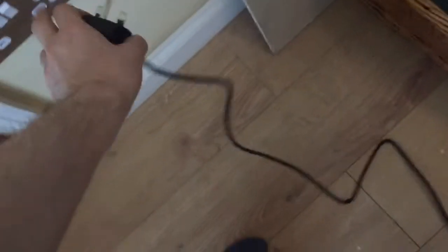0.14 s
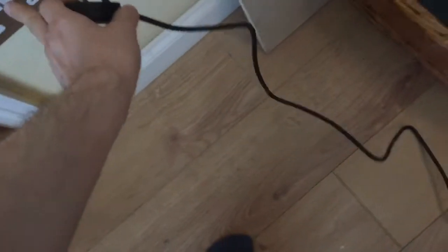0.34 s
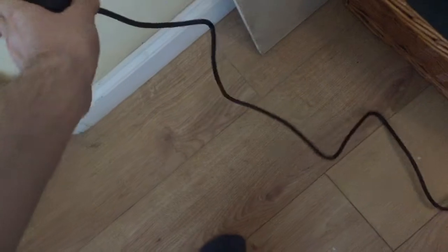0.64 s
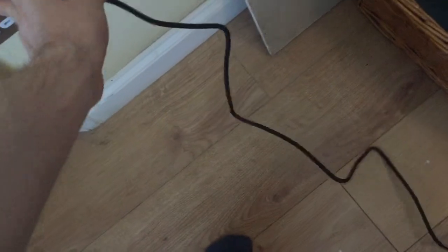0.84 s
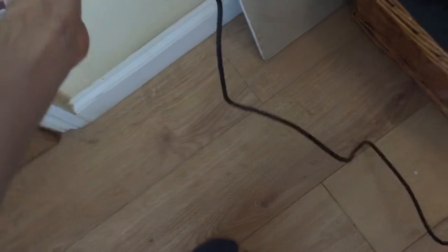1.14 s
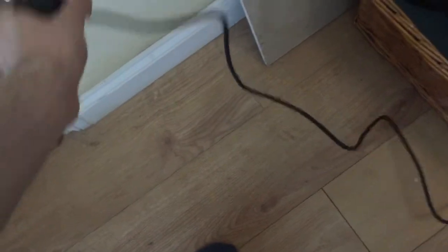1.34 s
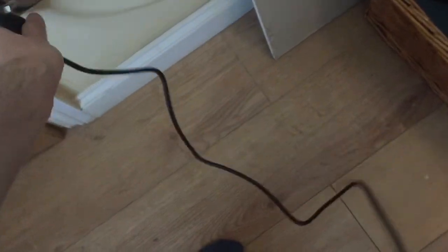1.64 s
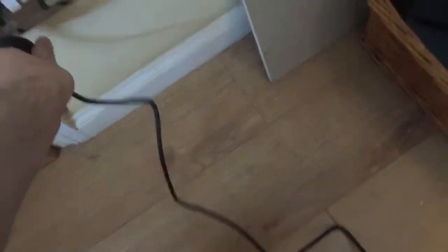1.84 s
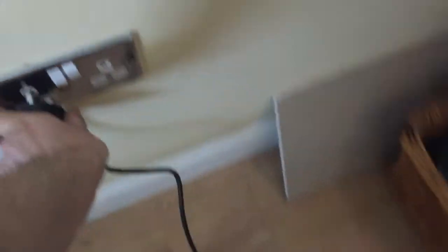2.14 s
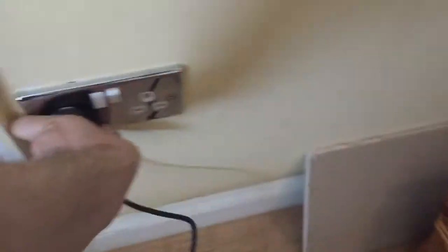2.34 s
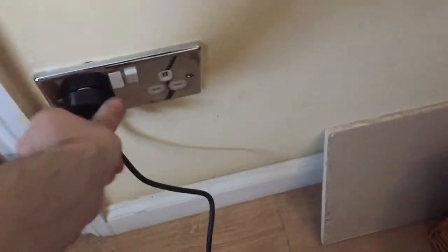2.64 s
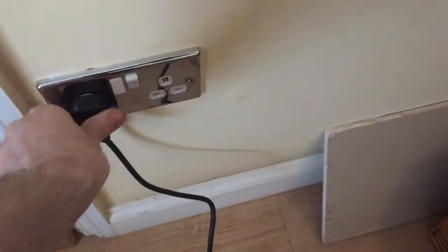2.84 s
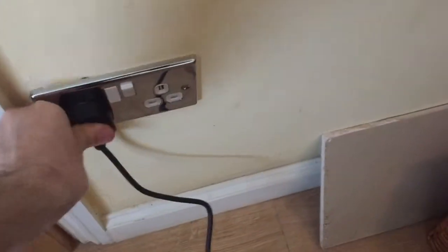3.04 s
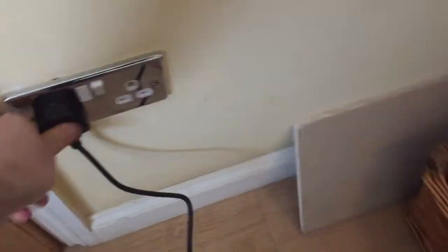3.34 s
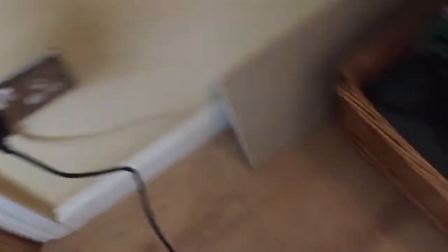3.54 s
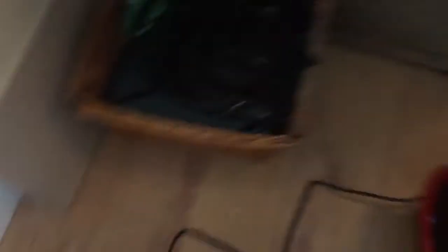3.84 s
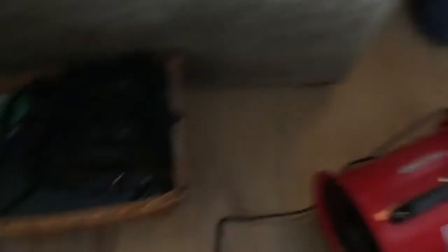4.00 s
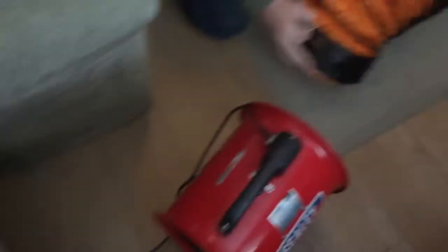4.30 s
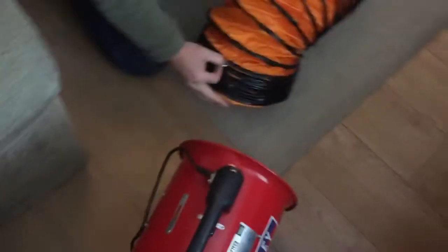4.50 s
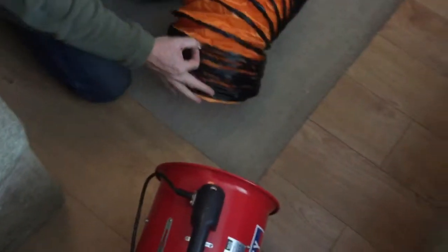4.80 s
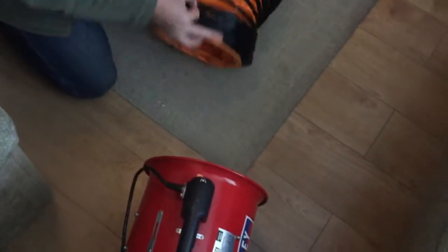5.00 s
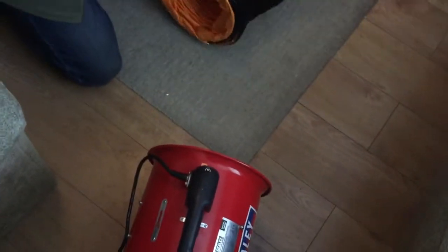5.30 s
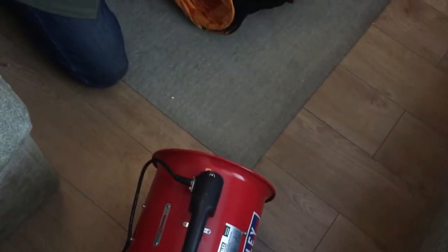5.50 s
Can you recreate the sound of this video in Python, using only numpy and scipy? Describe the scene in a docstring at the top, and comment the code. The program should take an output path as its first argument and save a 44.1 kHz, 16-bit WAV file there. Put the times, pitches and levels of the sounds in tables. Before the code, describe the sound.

A quiet, small furnished room with soft, steady room tone, captured by a handheld camera with low handling rumble. At 0 s the pins of a mains plug clink and shimmer lightly, with finger rubs and a faint scrape near 0.3 s. Dull bumps and a muted knock come around 0.9-1.0 s, then a socket switch snaps very sharply at 1.2 s. From 1.57 s the plug knocks on the steel faceplate, with a bright, hard clack at 1.75 s, a rattling cluster around 2.0 s and more grazing and knocks at 2.3-2.5 s. It grinds in and seats with a hollow wall thump at 2.76 s; tiny clicks and metallic ticks follow to 3.1 s. From 3.4 s a plastic duct further off crinkles sparsely, swelling into dense snaps and soft booms at 4.2-4.6 s. Scattered pops follow, a springy metal twang at 5.1 s, and a last faint tick at 5.6 s.

```python
"""Plug and socket up close, plastic duct further off

A small furnished room, heard through a hand-held camera's microphone. Close by, a mains plug clinks (ringing pins),
a socket switch snaps (three quick pulses and a rattle), and the plug knocks and grazes on the steel faceplate (noise
bursts through resonances) and is shoved home (grinding, then a thump). Further off, a plastic air duct booms, crinkles
and creases as it is squeezed. Fingers rub, soft things bump, metal twangs; a quiet room tone lies under it all.
"""
import sys
import numpy as np
from scipy import signal
from scipy.fft import rfft, irfft, next_fast_len
from scipy.io import wavfile
from scipy.ndimage import uniform_filter1d, map_coordinates

SR = 44100
rng = np.random.default_rng(int(sys.argv[2]) if len(sys.argv) > 2 else 0)


def wrap_up_sound(samples):
    """Save the sound to the file named by the first command line argument, as 16-bit audio."""
    columns = np.atleast_2d(samples).T
    # keep every value between -1 and 1, then stretch to whole-number steps
    tamed = np.clip(columns, -1, 1)
    steps = np.round(tamed * 32767).astype(np.int16)
    wavfile.write(sys.argv[1], SR, steps)


N = 249372
TIME = np.arange(N) / SR
AGE = TIME[:SR // 2]  # the half second that one short event may last
LEAD_S = 0.01  # surfaces graze this long before they crack together


def amp(db):
    """Decibels to gain."""
    return 10 ** (np.asarray(db) / 20)


def unit(x):
    """x at rms 1."""
    return x / np.sqrt(np.mean(x ** 2) + 1e-20)


def unit_hit(x):
    """x at rms 1 over its loudest 6 ms."""
    power = uniform_filter1d(x ** 2, size=265, mode="constant")
    return x / np.sqrt(power.max() + 1e-20)


def fade(t, t60):
    """A decay of 60 dB in t60 seconds (at least 1 ms)."""
    return 1000. ** (-t / np.maximum(t60, 1e-3))


def swell(s, hold, rise, fall):
    """An envelope that swells up to time s, holds, and dies away; rise and fall are seconds per 60 dB."""
    return fade(np.maximum(s - TIME, 0), rise) * fade(np.maximum(TIME - s - hold, 0), fall)


def gestures(rows, rise, fall):
    """The envelopes of the two layers that each row (start, hold, level, level) drives."""
    return sum(amp(levels_db)[:, None] * swell(s, hold, rise, fall) for s, hold, *levels_db in rows)


def wobble(size, per_s):
    """A smooth random curve, per_s knots a second."""
    at = np.arange(size) * per_s / SR
    return map_coordinates(rng.standard_normal(int(at[-1]) + 4), [at])


def add(track, s, sound):
    """Mix a sound into the track at time s."""
    part = track[max(round(s * SR), 0):][:len(sound)]
    part += sound[:len(part)]


def along(points, hz):
    """Read a (Hz, value) curve along a log frequency axis."""
    f, v = np.transpose(points)
    return np.interp(np.log(hz + 1), np.log(f + 1), v)


def filtered(x, response):
    """x times a response of frequency."""
    m = next_fast_len(len(x) + SR // 4)
    return irfft(rfft(x, m) * response(np.fft.rfftfreq(m, 1 / SR)), m)[:len(x)]


def coloured(x, spectrum):
    """x shaped by a (Hz, dB) spectrum, at rms 1."""
    return unit(filtered(x, lambda hz: amp(along(spectrum, hz))))


def noise(spectrum, size=N):
    """Smooth coloured noise at rms 1."""
    return coloured(rng.standard_normal(size), spectrum)


def grains(spectrum, per_s, spread_db, smooth):
    """Friction: tiny slips of uneven size on a bed of noise."""
    size = amp(spread_db * np.clip(rng.standard_normal(N), -2, 2))
    slips = (rng.random(N) < per_s / SR) * rng.choice([-1, 1], N) * size
    return coloured(unit(slips) + smooth * rng.standard_normal(N), spectrum)


def ring(modes):
    """Struck modes (Hz, dB, t60 s), at new strengths for each blow."""
    out = np.zeros(len(AGE))
    for hz, db, t60 in modes:
        strength = amp(db + rng.normal(0, 0.4))
        out += strength * fade(AGE, t60) * np.sin(2 * np.pi * (hz * AGE + rng.random()))
    return unit_hit(out)


def resonate(x, modes):
    """x through parallel (Hz, width Hz, dB) resonances of alternating sign."""
    def response(f):
        total = 0
        for k, (hz, width, db) in enumerate(modes):
            peak = 1j * f * width / (hz * hz - f * f + 1j * f * width)
            total = total + (-1) ** k * amp(db) * peak
        return total
    return filtered(x, response)


def strike(t60, lead_db, crack):
    """A contact: surfaces graze for LEAD_S, crack together and settle in uneven rebounds."""
    t = AGE - LEAD_S
    rebounds = amp(3 * wobble(len(t), per_s=450) - 1)
    before = amp(lead_db) * fade(abs(t), 0.019)
    after = rebounds * fade(abs(t), t60) + crack * fade(abs(t), 0.001)
    return np.where(t < 0, before, after) * rng.standard_normal(len(t))


def voiced(burst, edges, levels_db):
    """A burst split into bands, each at its own strength."""
    out = 0
    for band, db in zip(zip(edges, edges[1:]), levels_db):
        sos = signal.butter(N=3, Wn=band, btype="band", fs=SR, output="sos")
        out = out + amp(db) * unit_hit(signal.sosfilt(sos, burst))
    return out


def tilted(bands_db, tilt_db):
    """Band levels tipped towards the treble by tilt_db per band."""
    steps = np.arange(len(bands_db))
    return np.asarray(bands_db) + tilt_db * (steps - steps.mean())


# small furnished room: pitch_hz [Hz], t60_s [s]
ROOM_DECAY = [(200, 0.27), (700, 0.27), (2500, 0.24), (6000, 0.2), (12000, 0.17)]


def room(x):
    """The room's answer: a diffuse tail in which the treble dies first."""
    hz, t, z = signal.stft(rng.standard_normal(len(AGE)), SR, nperseg=256)
    decaying = z * fade(t, along(ROOM_DECAY, hz)[:, None])
    tail = signal.istft(decaying, SR, nperseg=256)[1]
    tail = tail * (1 - fade(np.arange(len(tail)) / SR, 0.013))  # reflections take a moment to build up
    return signal.fftconvolve(x, tail / np.linalg.norm(tail))[:len(x)]


def heard(x, room_db):
    """Direct sound plus the room at room_db; more room puts a source further from the microphone."""
    return x + amp(room_db) * room(x)


# room tone, spectral density: pitch_hz [Hz], level_db [dB, relative]
ROOM_TONE = [(15, -38.5), (25, -2), (64, -3.5), (273, 0), (485, -11.5), (697, -8.5), (2430, -12),
             (4900, -14.5), (6700, -15.5), (8910, -17), (12500, -26.5), (16200, -48.5), (22000, -120)]


def room_tone():
    """The quiet of the room: steady coloured noise."""
    return amp(-69.0) * noise(ROOM_TONE)


# fingers sliding over plug and cable, levels before the mix in handling():
# start_s [s], hold_s [s], body_db [dB], hiss_db [dB]
FINGER_STROKES = [(0.0, 0.023, -51, -49.5), (0.22, 0.039, -70, -57), (0.66, 0.59, -82, -74.5),
                  (1.05, 0.15, -64.5, -62), (1.6, 0.11, -54.5, -62.5), (1.94, .1, -48, -58.5),
                  (2.18, 0.29, -49, -55.5), (2.74, 0.17, -72, -56), (3.26, 0.17, -67.5, -71)]
STROKE_RISE_S, STROKE_FALL_S = 0.25, 0.64  # time to swell or die by 60 dB
# low and high part of the rubbing, spectral density: pitch_hz [Hz], level_db [dB, relative]
RUB_BODY_SPECTRUM = [(41, -44), (70, -7), (124, -6.5), (422, -4.5), (492, -10), (670, -6), (899, -11),
                     (2000, -11.5), (2600, -51.5), (4400, -120)]
RUB_HISS_SPECTRUM = [(710, -8.5), (1200, -8), (1580, -7.5), (2660, -2), (3710, -0.5), (4880, -8),
                     (8700, -8.5), (12500, -46), (16200, -62), (22000, -120)]
# resonances of plug and faceplate: pitch_hz [Hz], width_hz [Hz], level_db [dB, relative]
PLATE_MODES = [(260, 270, -11), (703, 120, 3), (800, 130, -4), (1038, 180, -2.5), (1980, 200, -5),
               (2480, 260, 3.5), (3220, 230, -1.5), (3450, 210, 1.5), (4284, 120, -1), (4280, 280, -8.5),
               (5950, 420, 1), (6750, 250, 2), (6900, 90, 8), (8200, 980, -0.5)]
# soft bumps: start_s [s], level_db [dB, before BUMP_TRIM_DB], pitch_hz [Hz]
SOFT_BUMPS = [(0.211, -54, 372), (0.312, -49.5, 154), (0.831, -44.5, 99), (0.888, -37.5, 60.7),
              (0.923, -49.5, 375), (0.98, -36.5, 344), (1.06, -49.5, 124), (1.574, -30.5, 339),
              (2.128, -50, 370), (2.332, -36.5, 104), (2.418, -42, 117), (2.764, -35, 150),
              (3.545, -47, 208), (3.946, -43, 60), (4.03, -49, 60), (4.101, -35, 311), (4.502, -30.5, 322),
              (5.055, -35, 224), (5.077, -40.5, 107), (5.239, -39, 183)]
BUMP_TRIM_DB = -4
# jolts of the hand that holds the camera: peak_s [s], level_db [dB, before RUMBLE_TRIM_DB]
HAND_JOLTS = [(0.03, -69), (0.39, -53.5), (0.884, -50), (1.05, -59), (1.6, -54), (1.86, -52.5), (2.02, -49),
              (2.33, -42), (2.771, -37), (3.13, -57), (3.64, -60), (4.0, -66), (4.32, -64), (4.511, -40.5),
              (5.081, -57), (5.27, -65)]
JOLT_RISE_S, JOLT_FALL_S = 0.22, 0.24  # time to swell or die by 60 dB
TREMOR_DB, RUMBLE_TRIM_DB = -74, -5.0  # rumble of a still hand before the trim; trim of all rumble
# handling rumble, spectral density: pitch_hz [Hz], level_db [dB, relative]
RUMBLE_SPECTRUM = [(20, -24), (45, 0), (100, -1.5), (160, -11), (300, -56)]


def handling():
    """Fingers catch and slip on plug and cable; soft things bump; the camera rumbles in the hand."""
    body, hiss = gestures(FINGER_STROKES, STROKE_RISE_S, STROKE_FALL_S)
    catching = amp(2.5 * wobble(N, per_s=60))
    slips = grains(RUB_BODY_SPECTRUM, per_s=360, spread_db=3.5, smooth=0.9)
    friction = amp(-2.5) * body * slips + amp(-1.5) * hiss * noise(RUB_HISS_SPECTRUM)
    friction = catching * friction
    out = 0.6 * friction + 0.19 * resonate(friction, PLATE_MODES)  # the plug colours the rubbing
    for s, db, hz in SOFT_BUMPS:
        u = AGE / (0.003 + 0.25 / hz)  # deeper bumps swell and die more slowly
        push = u * np.exp(1 - u) * np.sin(2 * np.pi * hz * AGE)
        add(out, s, heard(amp(db + BUMP_TRIM_DB) * push, room_db=-8))
    shake = amp(TREMOR_DB) + sum(amp(db) * swell(s, 0, JOLT_RISE_S, JOLT_FALL_S) for s, db in HAND_JOLTS)
    return out + amp(RUMBLE_TRIM_DB) * shake * noise(RUMBLE_SPECTRUM)


# ringing metal of the plug's pins: pitch_hz [Hz], level_db [dB, relative], t60_s [s]
PIN_MODES = [(2310, -9, 0.44), (2430, 0, 0.53), (2980, -8, 0.37), (3400, -1, 0.67), (3350, 7, 0.11),
             (3180, -4, 0.32), (4200, -20, 0.29), (4320, -12, 0.99), (5140, -23, 0.26), (5820, -31, 5.0),
             (6460, -33, 0.45), (6850, -10, 0.55)]
# contact noise and scrape of the pins, spectral density: pitch_hz [Hz], level_db [dB, relative]
CLINK_SPECTRUM = [(120, -16), (200, -9), (492, -28), (785, -6), (982, -46), (1230, -15), (1860, -15),
                  (2540, -11), (2770, -5.5), (6150, -13), (12500, -37), (16200, -72), (22000, -120)]
SCRAPE_SPECTRUM = [(880, -46), (1500, -22), (1880, -17), (2280, 7), (2690, 7.5), (3010, 3), (3940, -1),
                   (4260, 1), (5530, -6), (5680, 3), (6820, -0.5), (9490, -13), (12000, -32), (15600, -60),
                   (22000, -120)]


def clink():
    """The plug's metal pins clink and shimmer, then scrape lightly as it is lifted."""
    out = np.zeros(N)
    contact = unit_hit(noise(CLINK_SPECTRUM, size=len(AGE)) * fade(AGE, 0.073))
    shimmer = unit(resonate(noise(SCRAPE_SPECTRUM, size=len(AGE)), [(2540, 1500, 0)])) * fade(AGE, 0.42)
    add(out, 0.016, amp(-34.0) * contact + amp(-42.0) * shimmer + amp(-50.0) * ring(PIN_MODES))
    lift = np.exp(-((TIME - 0.28) / 0.039) ** 2)
    out += amp(-57.0) * noise(SCRAPE_SPECTRUM) * lift
    return heard(out, room_db=-5)


# limits of thud, knock, clack and tick: edge_hz [Hz]
KNOCK_EDGES_HZ = [150, 500, 1500, 4500, 9400]
# those four bands in an average touch: level_db [dB, relative]
KNOCK_BAND_LEVELS_DB = [-11, -1.5, 0, -6]


def touch(t60, hardness_db):
    """A short chatter excites the resonances of plug and plate; hard touches are brighter."""
    chatter = strike(t60, lead_db=-26, crack=0.4)
    # grip and point of contact detune the modes and stress different ones
    modes = [(hz * rng.normal(1, 0.015), width, db + rng.normal(0, 1.8)) for hz, width, db in PLATE_MODES]
    bands_db = tilted(KNOCK_BAND_LEVELS_DB, hardness_db)
    return voiced(0.35 * chatter + resonate(chatter, modes), KNOCK_EDGES_HZ, bands_db)


# the fingers work the plug towards the holes: start_s [s], end_s [s]
FUMBLE_SPAN_S = (1.6, 2.66)
GRAZE_DB, GRAZE_SPREAD_DB, GRAZE_T60_S = -6, 0.5, 0.012  # level re body_db of the strokes, scatter, decay


def grazes(count):
    """While the fingers work the plug towards the holes, its pins graze the plate at random."""
    out = np.zeros(N)
    times = rng.uniform(*FUMBLE_SPAN_S, count)
    for s, (size, hardness) in zip(times, rng.uniform(-1, 1, (count, 2))):
        graze = touch(GRAZE_T60_S, hardness_db=3 * hardness)
        add(out, s, amp(GRAZE_DB + GRAZE_SPREAD_DB * size) * graze)
    rubbing, _ = gestures(FINGER_STROKES, STROKE_RISE_S, STROKE_FALL_S)
    return rubbing * out


# plug and socket knocking together: start_s [s, before KNOCK_DELAY_S], level_db [dB, before KNOCK_TRIM_DB],
# hardness_db [dB of tilt per band], t60_s [s]
PLUG_KNOCKS = [(0.378, -56.5, -13, 0.018), (0.977, -35, -2, 0.034), (1.001, -42.5, -5.5, 0.11),
               (1.569, -27, -0.5, 0.07), (1.749, -17.5, 5, 0.038), (1.757, -25.5, -1.5, 0.026),
               (1.78, -43, -11, 0.075), (1.82, -31, 0, 0.12), (1.866, -43.5, 5, .012),
               (1.964, -52, -12.5, 0.03), (1.996, -29, -2.5, 0.034), (2.007, -35.5, 1, 0.075),
               (2.194, -45, -5.5, .015), (2.258, -43, 0.5, 0.062), (2.3143, -26, -2, 0.079),
               (2.329, -29.5, 4.5, 0.018), (2.342, -38.5, 2, 0.0066), (2.411, -29, 4.5, 0.033),
               (2.48, -36.5, -3, 0.027), (2.753, -37, -4, 0.033), (2.828, -53, 11, 0.036),
               (2.838, -51.5, 13.5, 0.0096), (3.092, -47.5, 1.5, 0.016), (3.103, -46, -7, 0.044),
               (3.131, -43, 5.5, 0.057)]
KNOCK_DELAY_S, KNOCK_TRIM_DB, KNOCK_ROOM_DB = 0.0024, -6.5, -12


def plug():
    """The plug knocks on the faceplate, with light grazes in between."""
    out = heard(grazes(count=20), KNOCK_ROOM_DB)
    for s, db, hardness_db, t60 in PLUG_KNOCKS:
        knock = amp(db + KNOCK_TRIM_DB) * touch(t60, hardness_db)
        add(out, s + KNOCK_DELAY_S - LEAD_S, heard(knock, KNOCK_ROOM_DB))
    return out


# short slides of plug, fingers and cable: middle_s [s], level_db [dB], pitch_hz [Hz], half_length_s [s]
SHORT_SLIDES = [(0.678, -79, 4030, 0.085), (1.084, -57, 1450, 0.027), (2.145, -61, 693, 0.021),
                (2.263, -57, 960, 0.047), (2.411, -37.5, 3300, 0.005), (2.918, -56.5, 1020, 0.011),
                (3.068, -57.5, 1080, 0.015), (3.104, -51.5, 970, 0.013), (3.274, -67, 1050, 0.056)]


def scuffs():
    """Brief slides swell and fade, each rasping around one pitch."""
    out = np.zeros(N)
    middle = AGE.mean()
    for s, db, hz, half in SHORT_SLIDES:
        rasp = unit(resonate(rng.standard_normal(len(AGE)), [(hz, 0.23 * hz, 0)]))
        add(out, s - middle, amp(db) * rasp * np.exp(-((AGE - middle) / half) ** 2))
    return heard(out, room_db=-4.0)


# sprung metal in the socket and in the duct's wire hoop:
# start_s [s], level_db [dB], pitch_hz [Hz], width_hz [Hz], t60_s [s]
METAL_TWANGS = [(0.719, -68, 4320, 4000, 0.019), (2.374, -49.5, 4300, 1200, 0.016),
                (2.828, -45.5, 5500, 600, 0.032), (2.891, -56, 5160, 1220, 0.035),
                (3.134, -45.5, 5100, 500, 0.11), (3.141, -50, 11400, 3520, 0.03),
                (3.632, -53.5, 5100, 300, 0.055), (3.741, -48.5, 5150, 350, 0.24),
                (4.703, -51, 4450, 500, 0.054), (4.753, -46.5, 4520, 600, 0.05),
                (5.088, -34.5, 1077, 298, 0.16), (5.092, -42.5, 8600, 1360, 0.19),
                (5.119, -41.5, 1060, 180, 0.19)]


def twangs():
    """Springy metal buzzes briefly around one pitch: a strike through two resonances in a row."""
    out = np.zeros(N)
    for s, db, hz, width, t60 in METAL_TWANGS:
        buzz = resonate(strike(t60, lead_db=-32, crack=0.55), [(hz, width, 0)])
        add(out, s - LEAD_S, amp(db) * unit_hit(resonate(buzz, [(hz, 2 * width, 0)])))
    return out


# the rocker's contacts as it flips over: start_s [s], peak_db [dB], pitch_hz [Hz], swell_s [s, half the time to peak]
ROCKER_CONTACTS = [(1.1965, -9, 2520, 0.00032), (1.1974, -18, 5660, 0.00014), (1.1983, -15, 6480, 0.00049)]
# switch housing, spectral density: pitch_hz [Hz], level_db [dB, relative]
HOUSING_SPECTRUM = [(300, -38.5), (700, -17.5), (1200, -6), (1700, -8), (2150, 0.5), (2600, -3.5),
                    (3400, 0.5), (4800, -8.5), (5400, -5), (6000, -10.5), (6550, -8), (7400, -3.5),
                    (9300, -11.5), (12500, -22)]


def switch():
    """The sprung rocker flips over in three quick contacts and shakes its housing."""
    out = np.zeros(N)
    for s, db, hz, swell_s in ROCKER_CONTACTS:
        u = AGE / swell_s
        pulse = u ** 2 * np.exp(-u)  # a smooth push, so no bass
        add(out, s, amp(db) * pulse / pulse.max() * np.sin(2 * np.pi * hz * AGE))
    rattle = noise(HOUSING_SPECTRUM, size=len(AGE)) * fade(AGE, 0.027) * (1 - fade(AGE, 0.0056))
    add(out, 1.1962, amp(-20.5) * unit_hit(rattle))
    return heard(out, room_db=-12)


# dull groan of pins in the spring contacts, spectral density: pitch_hz [Hz], level_db [dB, relative]
GROAN_SPECTRUM = [(40, -32), (90, -8.5), (170, -6.5), (300, -5.5), (400, -23.5), (600, -11), (1000, -17),
                  (1600, -15.5), (3000, -21.5), (8000, -40.5)]
# the pins' fine rasp, spectral density: pitch_hz [Hz], level_db [dB, relative]
GRIT_SPECTRUM = [(400, -8), (1000, 6.5), (2000, -7.5), (4500, -5), (9000, -8), (10500, -20), (12500, -39)]
# hollow wall behind the socket: pitch_hz [Hz], level_db [dB, relative], t60_s [s]
WALL_MODES = [(177, 10.5, 0.11), (304, -10, 0.084), (415, -5, 0.24), (469, -4, 0.25), (557, 7, 0.076),
              (603, 7, 0.087), (730, -2, 0.15), (850, -30, 0.28), (883, -1, 0.15)]


def shove():
    """The pins grind into their springs ever harder until the plug seats and thumps the wall."""
    seat_s = 2.758
    away = abs(TIME - seat_s)
    force = np.where(TIME < seat_s, 0.53 * fade(away, 0.34), fade(away, 0.29))
    rasp = grains(GRIT_SPECTRUM, per_s=900, spread_db=5, smooth=0.4)
    out = force * (amp(-34) * noise(GROAN_SPECTRUM) + amp(-37.0) * rasp)
    add(out, seat_s, amp(-28.0) * ring(WALL_MODES) * (1 - fade(AGE, 0.0048)))
    return heard(out, room_db=-13.0)


# limits of pop, snap and tick: edge_hz [Hz]
CREASE_EDGES_HZ = [560, 1500, 5000, 9500]
# those three bands in an average crease: level_db [dB, relative]
CREASE_BAND_LEVELS_DB = [-6, -0.5, -4.5]


def crease(hz, t60, sharpness_db):
    """One crease buckles and rings at its own pitch."""
    buckle = strike(t60, lead_db=-12.5, crack=1.0)
    panel = resonate(buckle, [(hz, 100 + 0.27 * hz, 6)])
    return voiced(buckle + panel, CREASE_EDGES_HZ, tilted(CREASE_BAND_LEVELS_DB, sharpness_db))


# hands squeezing the duct: start_s [s], hold_s [s], boom_db [dB], crinkle_db [dB]
DUCT_SQUEEZES = [(3.366, 0.012, -71.5, -63.5), (3.611, .01, -55, -61.5), (3.741, 0.0081, -77, -59.5),
                 (3.828, 0.059, -70, -54), (3.998, 0.0062, -59, -56), (4.127, 0.11, -55.5, -52.5),
                 (4.286, 0.093, -46.5, -43.5), (4.479, 0.037, -45.5, -50.5), (4.569, 0.012, -50.5, -72),
                 (4.867, .02, -67.5, -64.5), (5.057, 0.042, -56.5, -50), (5.215, 0.037, -52.5, -54.5)]
SQUEEZE_RISE_S, SQUEEZE_FALL_S = 0.15, 0.27  # time to swell or die by 60 dB
CREASE_HZ, CREASE_TILT_DB = 2220, 4  # middle pitch of small creases; tilt per band for each octave above it
SMALL_DB, SMALL_SPREAD_DB, SMALL_T60_S = 3, 2.5, 0.017  # level over the crinkle, scatter, decay


def small_creases(count):
    """Small creases of random pitch and size, scattered over the time in which the duct is squeezed."""
    out = np.zeros(N)
    times = rng.uniform(DUCT_SQUEEZES[0][0], DUCT_SQUEEZES[-1][0], count)
    for s, (size, octaves) in zip(times, rng.uniform(-1, 1, (count, 2))):
        snap = crease(CREASE_HZ * 2 ** octaves, SMALL_T60_S, CREASE_TILT_DB * octaves)  # higher ones are sharper
        add(out, s, amp(SMALL_DB + SMALL_SPREAD_DB * size) * snap)
    return out


# large creases snapping over: start_s [s, before CREASE_DELAY_S], level_db [dB, before CREASE_TRIM_DB],
# sharpness_db [dB of tilt per band], pitch_hz [Hz], t60_s [s]
LARGE_CREASES = [(3.372, -39, -1, 2520, 0.056), (3.384, -48.5, 13, 8800, 0.02),
                 (3.625, -44.5, -2.5, 1200, 0.095), (3.739, -40, 0.5, 1120, 0.11),
                 (3.828, -33.5, 5.5, 8640, 0.041), (3.837, -40, 3, 8200, 0.067),
                 (3.874, -42, 7.5, 6300, .024), (3.893, -39.5, 0.5, 2080, 0.064),
                 (3.986, -43.5, 2, 3070, 0.03), (4.044, -44, 6.5, 6240, 0.11),
                 (4.088, -35.5, 1.5, 2800, 0.036), (4.103, -33.5, -0.5, 1680, 0.039),
                 (4.159, -46.5, 8, 5600, 0.038), (4.196, -32, -2.5, 2100, 0.04),
                 (4.236, -36.5, -0.5, 3855, 0.036), (4.266, -37, 4, 2200, 0.036),
                 (4.285, -25.5, 2, 6400, 0.072), (4.303, -26, -3.5, 2700, 0.048),
                 (4.315, -36.5, 7, 1640, 0.018), (4.343, -35, 2, 1830, .04),
                 (4.359, -28, -0.5, 2820, 0.031), (4.386, -33.5, 3, 4050, 0.054),
                 (4.439, -26.5, -2, 2155, 0.058), (4.466, -28.5, -1.5, 2120, 0.015),
                 (4.502, -30, -2, 4070, 0.02), (4.537, -44.5, -6, 955, 0.021),
                 (4.567, -37, -2, 2260, 0.029), (4.62, -37.5, -2, 920, 0.0095),
                 (4.656, -54, 11.5, 4370, 0.009), (4.698, -48.5, 3, 4530, 0.0049),
                 (4.708, -44, -1, 4470, 0.006), (4.752, -35, -4, 870, 0.012),
                 (4.807, -48, -4.5, 2130, 0.033), (4.97, -49, -6, 1350, 0.089),
                 (5.052, -44.5, -9, 1316, 0.039), (5.073, -46, -14, 1050, 0.019),
                 (5.087, -31.5, 9, 1100, 0.024), (5.118, -38, 4.5, 1150, 0.0079),
                 (5.201, -41, -5, 1000, 0.27), (5.611, -45, 3.5, 2600, 0.024)]
CREASE_DELAY_S, CREASE_TRIM_DB = 0.000976, -5.5
# the air's boom after a crease: gain on the crease's level_db before its trim, swell, decay
DRUM_DB, DRUM_RISE_S, DRUM_T60_S = -15.5, 0.048, 0.067
# pitches of large to tiny folds: pitch_hz [Hz]
FOLD_PITCHES_HZ = [900, 2200, 4500, 8000]
# air in the duct, and its plastic skin, spectral density: pitch_hz [Hz], level_db [dB, relative]
TUBE_SPECTRUM = [(53, -41), (90, -20.5), (203, -5), (289, -3), (408, -5.5), (492, -12.5), (659, -23),
                 (700, -22.5), (910, -57), (1540, -120)]
FILM_SPECTRUM = [(250, -16), (500, -10), (800, -4), (1300, -6.5), (2200, 4), (4300, -6), (6500, -2),
                 (9000, -11), (10500, -54), (12500, -18)]


def duct():
    """Each squeeze makes the air inside boom and the skin crinkle; large creases snap over and drum the air."""
    boom, crinkle = gestures(DUCT_SQUEEZES, SQUEEZE_RISE_S, SQUEEZE_FALL_S)
    folds = np.zeros(N)
    for hz in FOLD_PITCHES_HZ:
        slips = grains(FILM_SPECTRUM, per_s=300, spread_db=2.5, smooth=0.3)
        folds += resonate(slips, [(hz, 0.66 * hz, 0)])
    out = heard(crinkle * (unit(folds) + small_creases(count=30)), room_db=-12)
    drum = (1 - fade(AGE, DRUM_RISE_S)) * fade(AGE, DRUM_T60_S)
    for s, db, sharpness_db, hz, t60 in LARGE_CREASES:
        snap = amp(db + CREASE_TRIM_DB) * crease(hz, t60, sharpness_db)
        add(out, s + CREASE_DELAY_S - LEAD_S, heard(snap, room_db=-5.0))
        add(boom, s, amp(db + DRUM_DB) * drum)
    return out + boom * noise(TUBE_SPECTRUM)


def scene():
    """All sources over the quiet of the room."""
    socket = clink() + switch() + plug() + scuffs() + shove()
    return (socket + twangs() + handling() + duct() + room_tone())[None]


def record(dry):
    """The camera drops the deepest bass and keeps nothing above its band limit."""
    top_hz = 12500
    sos = signal.butter(N=3, Wn=32, btype="high", fs=SR, output="sos")
    low_cut = signal.sosfilt(sos, dry[0])
    return filtered(low_cut, lambda hz: 1 / np.sqrt(1 + (hz / top_hz) ** 160))[None]


dry = scene()
out = record(dry)
wrap_up_sound(out)
```